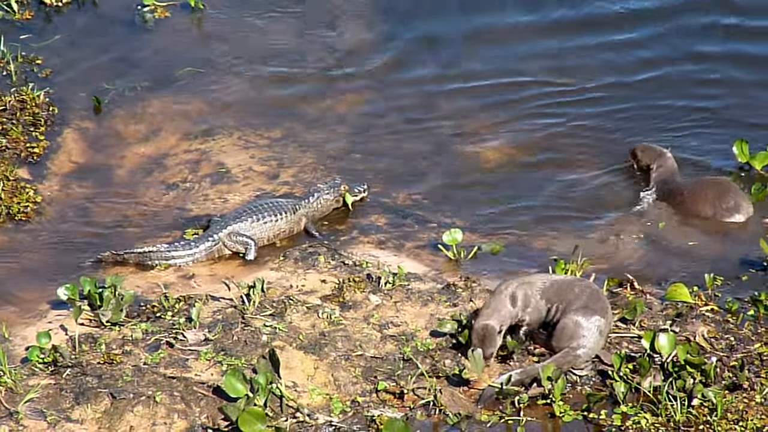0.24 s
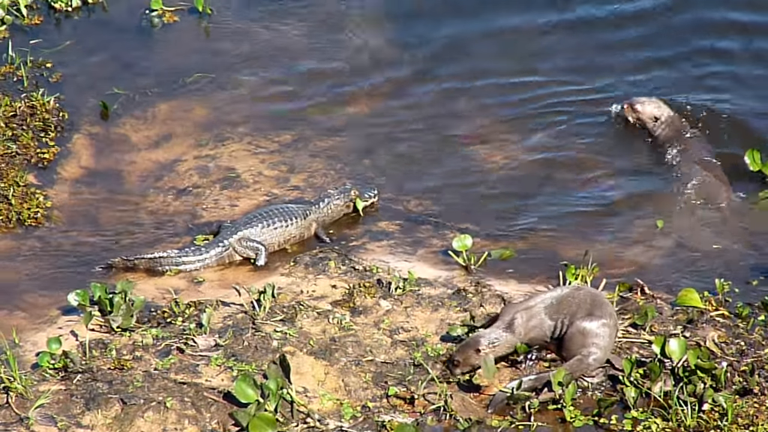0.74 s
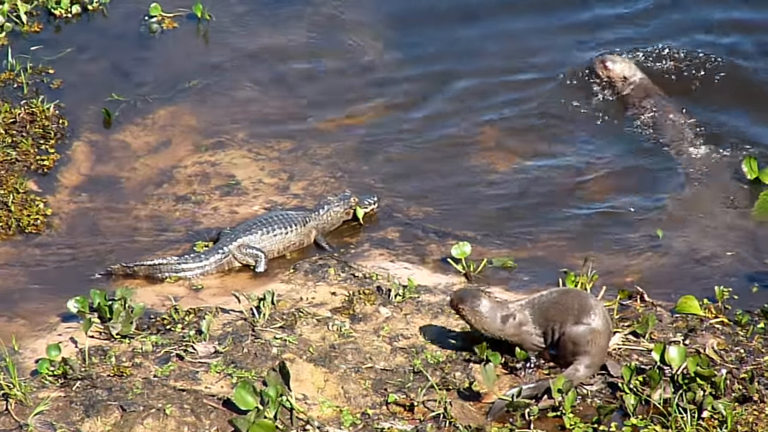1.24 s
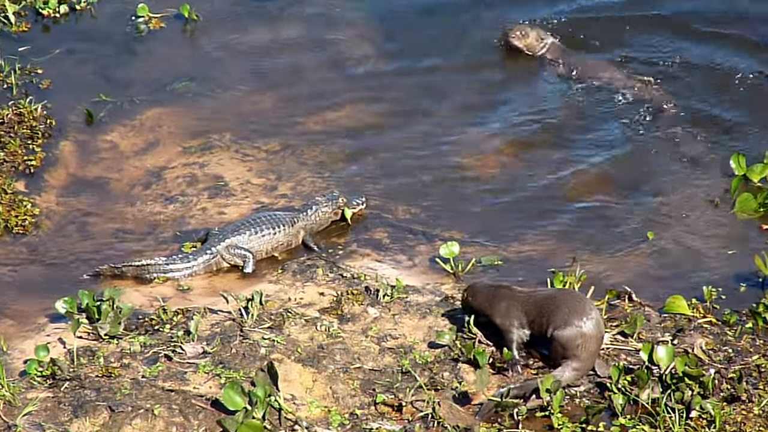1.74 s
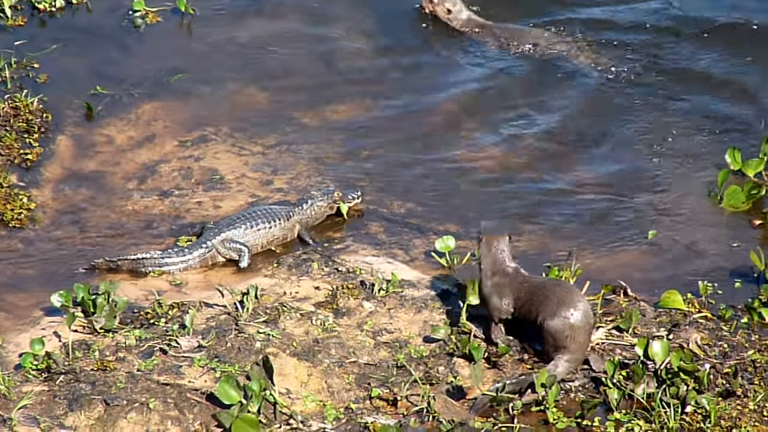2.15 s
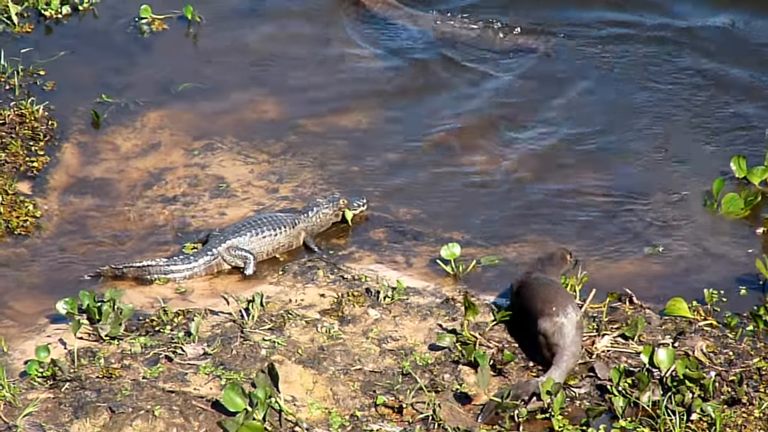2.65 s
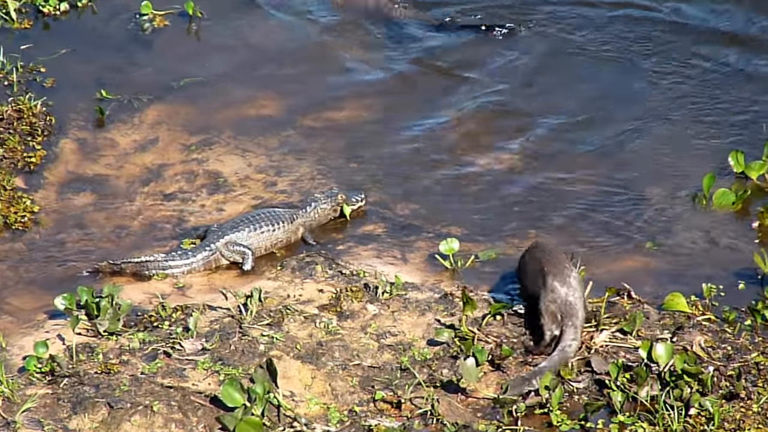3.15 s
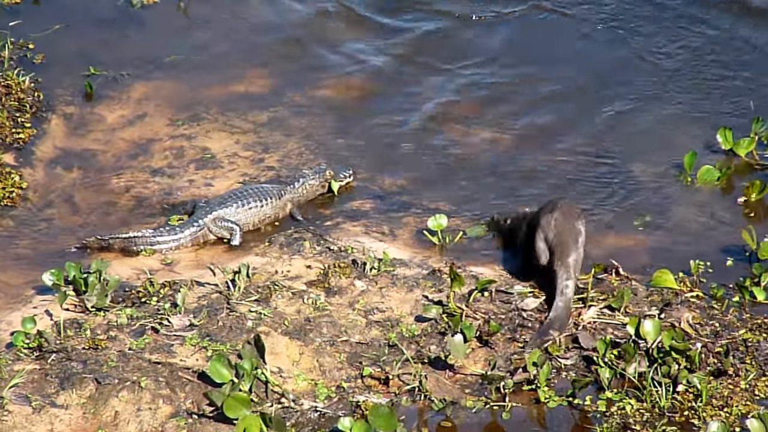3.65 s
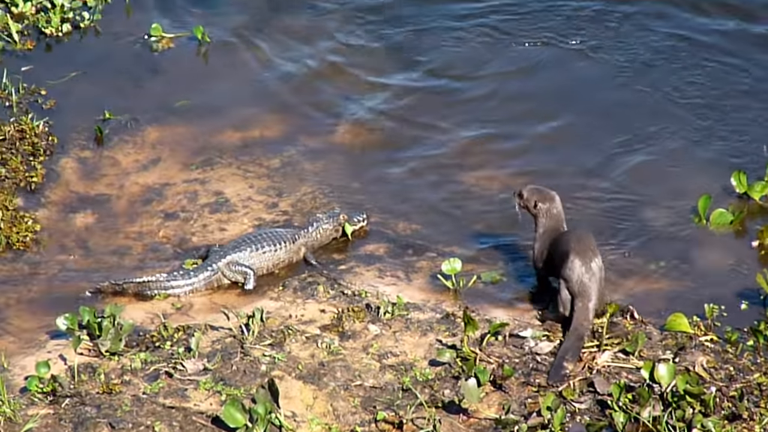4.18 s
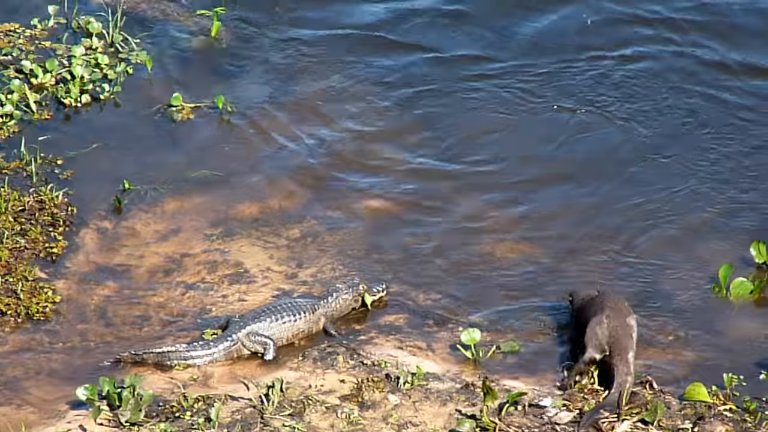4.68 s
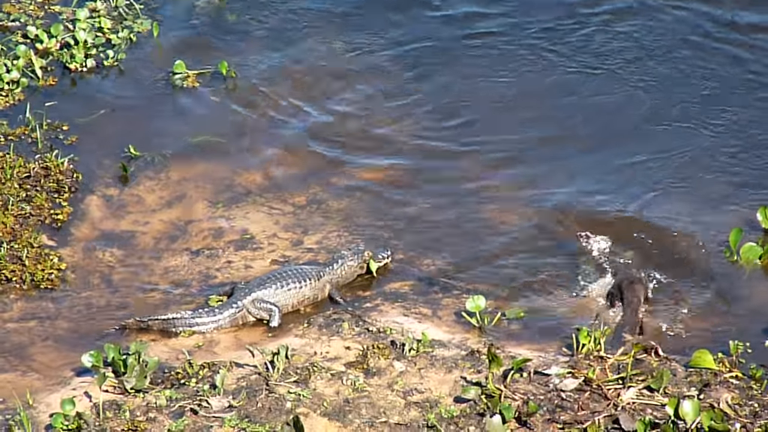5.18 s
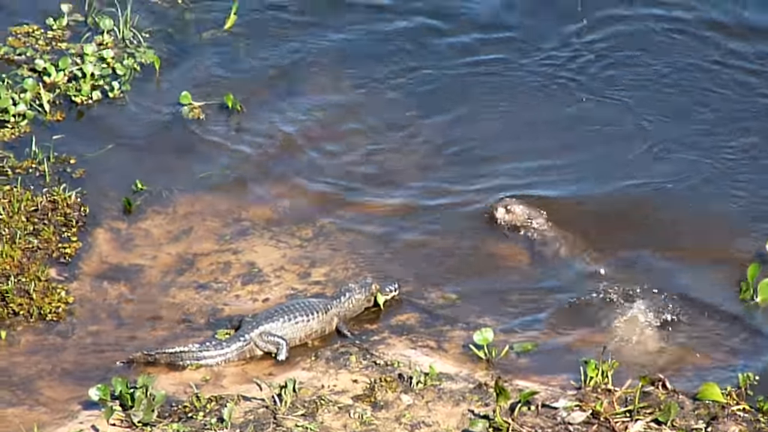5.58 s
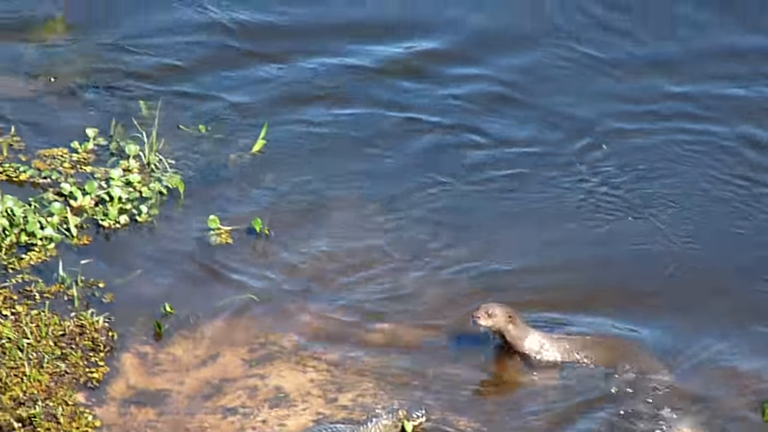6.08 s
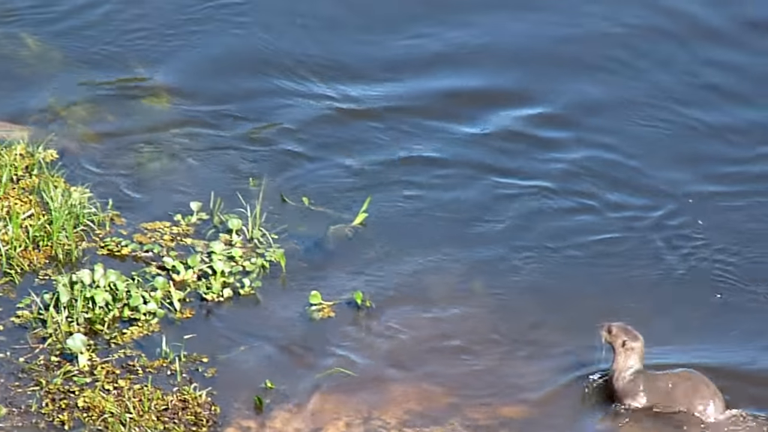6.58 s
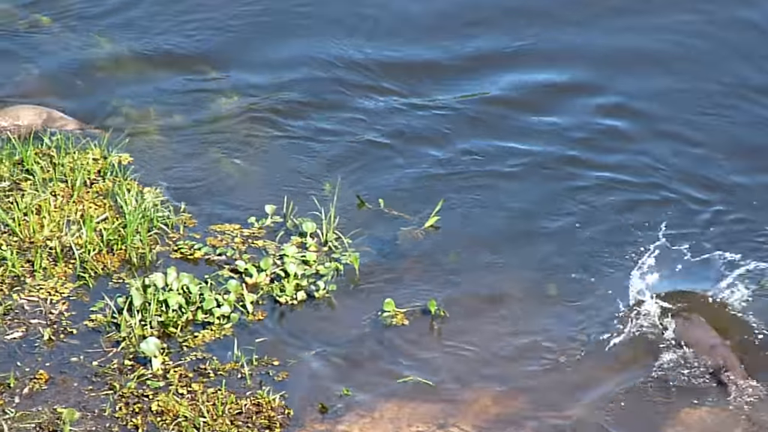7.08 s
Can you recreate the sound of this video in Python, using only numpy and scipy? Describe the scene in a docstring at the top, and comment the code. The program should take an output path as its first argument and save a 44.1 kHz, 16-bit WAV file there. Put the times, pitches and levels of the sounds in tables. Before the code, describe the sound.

A riverbank starts quietly with open-air hiss, a faint wavering hum and gentle water. Swimming otters make small splashes and bubbly plops at about 0.3, 1.4 and 2.7 seconds. Five thin, faint whistles fall in pitch far away between 1.4 and 5 seconds. From around 2.2 seconds, wind buffets the microphone with a low, uneven rumble and occasional soft thumps.

At 3 seconds a giant otter begins calling in short, high, stuttering bursts, each a rapid train of breathy chirps about a fifth of a second long, often turning raspy. Five bursts come closely together up to 4.7 seconds, with a slight echo from the bank. A splash and a cluster of plops follow near 5.1, then more calls at 5.3, 6.1 and, very briefly, 6.4 seconds. The wind is strongest from 6 seconds on, with light splashes and plops continuing until the end, just past 7 seconds.

```python
"""A riverbank. A giant otter calls in stuttering bursts, each a train of short scooped chirps:
harmonics and breath shaped by its throat. Swimming otters splash, and air bubbles ring as plops.
Thin whistles fall far off; the bank echoes calls, water and whistles.
Rising wind buffets the microphone over a faint wavering hum and hiss."""
import sys
import numpy as np
from scipy import signal
from scipy.fft import rfft, irfft, next_fast_len
from scipy.io import wavfile
from scipy.ndimage import map_coordinates

SR = 44100
rng = np.random.default_rng(int(sys.argv[2]) if len(sys.argv) > 2 else 0)


def to_wav(s):
    """Save 16-bit WAV."""
    ch = np.atleast_2d(s).T  # columns
    pcm = np.round(np.clip(ch, -1, 1) * 32767)  # PCM
    wavfile.write(sys.argv[1], SR, pcm.astype(np.int16))


N = 323025

# Spectra of open air, big eddies and quick eddies. Each row: frequency in Hz, relative density in dB.
AIR_DB = [(20, 4.5), (60, -7), (150, -2), (280, 2.5), (420, -1), (700, -5.5), (1100, -8.5), (1600, -15),
          (2500, -17), (4000, -19), (6500, -21.5), (8000, -30.5), (9000, -40.5), (10000, -50.5)]
BIG_EDDY_DB = [(10, -12.5), (25, -0.5), (50, 1), (75, 4), (110, -10.5), (250, -41), (2000, -100)]
QUICK_EDDY_DB = [(30, -34), (70, -6), (105, 2), (170, -1), (270, -7), (400, -13.5), (600, -22.5),
                 (1000, -35.5), (2000, -47), (5000, -68), (10000, -100)]
# Noise bands of the hum. Each row: centre in Hz, half width in Hz, level in dB.
HUM_BANDS = [(308.2, 12, -62), (485, 52, -61), (550.4, 28, -60), (1086, 87, -72.5)]
# Slow swell of the hum tone. Each row: time in seconds, relative level in dB.
HUM_SWELL_DB = [(0.0, -59), (0.45, -66), (1.47, -55.5), (2.14, -65), (2.57, -56.5), (3.38, -62.5),
                (3.99, -54), (4.34, -59.5), (6.03, -59.5), (6.32, -51), (6.99, -57), (7.32, -56.5)]
# Throbs of the hum tone. Each row: start in seconds, level in dB before the envelope.
HUM_THROBS = [(0.926, -40), (1.379, -44), (4.008, -40.5), (4.303, -37), (5.241, -36.5), (6.054, -40),
              (6.345, -40), (6.866, -58)]
# Steady whine: frequency in Hz, level in dB.
WHINE_HZ_DB = (6667, -88)
# Wind on the microphone. Each row: time in seconds, strength in dB.
WIND_DB = [(0.0, -68), (0.33, -65), (1.65, -61.5), (1.71, -50), (1.79, -60.5), (2.04, -56.5), (2.16, -38),
           (2.18, -48.5), (2.24, -61.5), (2.38, -39), (2.61, -35.5), (2.77, -47.5), (3.0, -45),
           (3.12, -56.5), (3.26, -55), (3.32, -44.5), (3.65, -42.5), (3.71, -52), (3.75, -39),
           (3.83, -45.5), (3.89, -47), (3.95, -58.5), (4.24, -56), (4.32, -44.5), (4.52, -45),
           (4.63, -38.5), (4.65, -46), (4.87, -52), (4.93, -40.5), (5.06, -50.5), (5.09, -37.5),
           (5.26, -54.5), (5.36, -43.5), (5.53, -41.5), (5.57, -44), (5.91, -35), (6.03, -40), (6.1, -34.5),
           (6.3, -41), (6.36, -36), (6.38, -35), (6.54, -34), (6.61, -31.5), (6.63, -39), (6.71, -33),
           (6.75, -45), (6.85, -32), (6.87, -39), (7.05, -33.5), (7.14, -40), (7.2, -33), (7.32, -52.5)]
# Hard buffets. Each row: centre in seconds, peak in dB, pitch in Hz, 1/e half length in seconds.
WIND_THUDS = [(.81, -52, 42, .016), (2.153, -29.5, 142, 0.007), (2.587, -32.5, 129, 0.0069),
              (3.751, -29, 70.5, 0.0068), (3.888, -36.5, 76, 0.012), (5.858, -27.5, 70, 0.0057),
              (6.384, -21, 83.5, 0.0044), (6.451, -22.5, 100, 0.0034), (7.055, -22, 111, 0.005),
              (7.187, -26.5, 40, 0.0099)]
# Echo decay of the bank. Each row: frequency in Hz, time to fall 60 dB in seconds.
BANK_T60_S = [(300, 0.14), (2200, 0.6), (3300, 0.64), (8000, 0.2)]
# Far whistles. Each row: start in seconds, length in seconds, top pitch in Hz, end pitch in Hz,
# level in dB, loudest point as a share of the length.
FAR_WHISTLES = [(1.354, 0.098, 2940, 2310, -60.5, 0.84), (2.663, 0.17, 3380, 2350, -66.5, 0.42),
                (3.115, .115, 3230, 3110, -64.5, .6), (3.952, 0.087, 2110, 1430, -64, 0.56),
                (4.813, 0.21, 3260, 2320, -63.5, .33)]
# Splashes. Each row: centre in seconds, level in dB, 1/e half length of the power in seconds.
SWIM_SPLASHES = [(0.313, -63, 0.024), (1.33, -67.5, 0.25), (2.683, -68, 0.24), (5.076, -61, 0.058),
                 (5.543, -69.5, 0.19), (6.55, -71, 0.17), (7.098, -65, 0.24)]
# Large bubbles. Each row: time in seconds, relative level in dB, first pitch in Hz.
BIG_PLOPS = [(.311, -51.5, 1660), (1.385, -57, 1590), (2.545, -54.5, 2060), (2.79, -53.5, 1060),
             (5.077, -53, 690), (5.08, -52, 1650), (5.103, -53.5, 1235), (5.123, -52.5, 1530),
             (5.231, -53, 1480), (6.541, -49, 1326), (6.936, -49.5, 776), (7.077, -50.5, 1520),
             (7.193, -52, 1820)]
# The otter's throat, plain and with jaws wide open. Each row: frequency in Hz, relative gain in dB.
THROAT_DB = [(500, -22), (1050, -8.5), (1500, -4.5), (1900, -5), (2250, 0), (2700, 0), (3300, -4),
             (3800, -12.5), (4500, -11.5), (5500, -25.5), (8000, -59)]
OPEN_JAW_DB = [(500, -23.5), (1050, -9.5), (1500, 1.5), (1900, -4), (2250, -2.5), (2700, -7.5),
               (3500, -1.5), (3950, -9), (4600, -19), (5500, -30), (8000, -49.5)]
# Otter bursts. Each row: start in seconds, chirp count, period in seconds, slow-start lag in seconds,
# first pitch in Hz, full-effort pitch in Hz, scoop as a share of pitch, level in dB, cut at the start
# in dB, cut at the end in dB, first and last roughness from 0 to 1, treble tilt in dB per octave.
CALL_BURSTS = [(3.019, 7, .0206, 0.0012, 900, 871, .27, -55, 5, -4, 0.82, .85, -9),
               (3.275, 8, .0202, .018, 941, 1057, .28, -50, -2.5, 2, .2, .6, -2.5),
               (3.665, 10, 0.023, 0.024, 857, 1050, 0.26, -47, 6, 12.5, 0.13, 0.42, -0.5),
               (4.077, 9, .021, 0.024, 885, 1100, 0.26, -48, 4.5, 3.5, 0.1, .4, 1),
               (4.513, 10, 0.02, 0.016, 943, 1136, 0.2, -47, 1, 1, 0.2, .88, 4),
               (5.281, 10, .0233, .007, 929, 1069, .2, -49, 0.5, 2, 0.19, 0.36, 4),
               (6.05, 9, .0222, 0.019, 950, 1193, 0.16, -49.5, 5.5, 1.5, 0.11, 0.66, 1.5),
               (6.418, 4, .0138, .006, 856, 1214, 0.21, -52, -1.5, 1.5, 0.31, 0.98, 1)]


def amp(db):
    """Decibels to gain."""
    return 10 ** (np.asarray(db) / 20)


def unit(x):
    """Scale to rms 1."""
    return x / np.sqrt(np.mean(x ** 2) + 1e-20)


def along(points, hz):
    """Interpolate (Hz, value) rows on a log axis."""
    knots_hz, values = np.transpose(points)
    return np.interp(np.log(hz + 1), np.log(knots_hz + 1), values)


def curve(rows):
    """(s, value) rows to one value per sample."""
    return np.interp(np.arange(N) / SR, *np.transpose(rows))


def wobble(rate_hz, size=N):
    """Smooth curve through random knots."""
    knots = rng.standard_normal(int(size * rate_hz / SR) + 4)
    return map_coordinates(knots, [np.arange(size) * rate_hz / SR])


def filtered(x, response):
    """Apply a gain given as a function of Hz."""
    size = next_fast_len(N + SR // 2)
    return irfft(rfft(x, size) * response(np.fft.rfftfreq(size, 1 / SR)), size)[:N]


def noise(spectrum):
    """Noise of rms 1 with a (Hz, dB) spectrum."""
    return unit(filtered(rng.standard_normal(N), lambda hz: amp(along(spectrum, hz))))


def add(track, start_s, sound):
    """Mix a sound into the track."""
    part = track[max(round(start_s * SR), 0):][:len(sound)]
    part += sound[:len(part)]


def hiss(level_db=-58):
    """Steady hiss of open air."""
    return amp(level_db) * noise(AIR_DB)


def hum(tone_hz=545, drift_hz=13, tone_db=-61, swell_db=3, shimmer_db=1.5, throb_s=.036):
    """Fuzzy noise bands, a tone that wavers, swells and throbs, and a thin steady whine."""
    bands = np.zeros(N)
    for hz, width_hz, db in HUM_BANDS:
        band = filtered(rng.standard_normal(N), lambda f: 1 / (1 + ((f - hz) / width_hz) ** 2))
        bands += amp(db) * unit(band)
    slow_db = curve(HUM_SWELL_DB)
    envelope = amp(tone_db + slow_db - slow_db.mean() + swell_db * wobble(7) + shimmer_db * wobble(45))
    u = np.linspace(0, 1, int(throb_s * SR))
    throb = (1 - np.exp(-(u / .087) ** 2)) * (1 - u) / 2
    for start_s, db in HUM_THROBS:
        add(envelope, start_s, amp(db) * throb)
    tone = unit(np.sin(2 * np.pi * np.cumsum(tone_hz + drift_hz * wobble(40)) / SR))
    whine_hz, whine_db = WHINE_HZ_DB
    whine = unit(np.sin(2 * np.pi * whine_hz * np.arange(N) / SR))
    return bands + envelope * tone + amp(whine_db) * whine


def wind(big_db=-6, quick_db=-3, big_lumps_db=3, quick_lumps_db=2, big_growth=1.15):
    """One wind strength drives big and quick eddies that push on the microphone; hard buffets thud."""
    strength_db = curve(WIND_DB)
    gust_db = strength_db - strength_db.mean()
    big = unit(amp(big_lumps_db * wobble(16)) * noise(BIG_EDDY_DB))
    quick = unit(amp(quick_lumps_db * wobble(35)) * noise(QUICK_EDDY_DB))
    eddies = amp(big_db + big_growth * gust_db) * big + amp(quick_db + gust_db) * quick
    out = amp(strength_db.mean()) * eddies
    for centre_s, db, hz, half_s in WIND_THUDS:
        t = np.arange(-4 * half_s, 4 * half_s, 1 / SR)
        add(out, centre_s + t[0], amp(db) * np.exp(-(t / half_s) ** 2) * np.cos(2 * np.pi * hz * t))
    return out


def bank_echo(x, build_s=.014, blocks=24):
    """Bank, trees and rippling water scatter sound back, a little differently from moment to moment."""
    out = np.zeros(N)
    for block in np.array_split(np.arange(N), blocks):
        hz, t, spectra = signal.stft(rng.standard_normal(SR * 3 // 4), SR, nperseg=256)
        envelope = amp(-60 * t / along(BANK_T60_S, hz)[:, None]) * (1 - np.exp(-t / build_s))
        tail = signal.istft(spectra * envelope, SR, nperseg=256)[1]
        piece = x[block] * signal.windows.tukey(len(block), .02)
        add(out, block[0] / SR, signal.fftconvolve(piece, tail / np.linalg.norm(tail)))
    return out


def whistles(crest_share=.31, waver=.004, flicker_db=4, fade_db_per_length=19):
    """Nearly pure tones arch and fall, flickering on their way through the wind."""
    out = np.zeros(N)
    for start_s, length_s, top_hz, end_hz, db, loudest in FAR_WHISTLES:
        size = int(length_s * SR)
        u = np.linspace(0, 1, size)
        arch = np.cos(np.pi / 2 * (u - crest_share) / (1 - crest_share)) ** 2
        pitch_hz = (end_hz + (top_hz - end_hz) * arch) * (1 + waver * wobble(150, size))
        tone = unit(np.sin(2 * np.pi * np.cumsum(pitch_hz) / SR) * amp(flicker_db * wobble(70, size)))
        envelope = amp(db - fade_db_per_length * np.abs(u - loudest)) * signal.windows.tukey(size, .2)
        add(out, start_s, tone * envelope)
    return out


def bubble(hz, cycles, rise_share=.12, onset_share=.1):
    """A pocket of air rings, rising in pitch as it nears the surface."""
    u = np.linspace(0, 1, int(cycles / hz * SR))
    envelope = (1 - np.exp(-(u / onset_share) ** 2)) * amp(-30 * u) * (1 - u)
    return 2 * envelope * np.sin(2 * np.pi * cycles * (u + rise_share * u * u / 2))


def water(bubble_count=1300, fizz_hz=1550, wash_gain=.5, lapping_db=-72):
    """Large plops over small bubbles and a soft wash, which swell with every splash."""
    plops, fizz = np.zeros(N), np.zeros(N)
    for time_s, db, hz in BIG_PLOPS:
        add(plops, time_s - .002, amp(db + 2.5) * bubble(hz, cycles=29.5))
    starts_s = rng.uniform(0, N / SR, bubble_count)
    for start_s, (higher, louder) in zip(starts_s, rng.standard_normal((bubble_count, 2))):
        add(fizz, start_s, amp(3.3 * louder) * bubble(fizz_hz * np.exp(.28 * higher), cycles=12))
    wash = noise([(300, -19.5), (700, 2), (1600, -2.5), (2500, -3), (4000, -25.5), (10000, -71.5)])
    t = np.arange(N) / SR
    power = np.full(N, amp(lapping_db) ** 2)
    for centre_s, db, half_s in SWIM_SPLASHES:
        power += amp(db) ** 2 * np.exp(-((t - centre_s) / half_s) ** 2)
    return plops + np.sqrt(power) * unit(unit(fizz) + wash_gain * wash)


def throat(hz, call_hz, gape, tilt_db_per_oct):
    """Gain of throat and jaws; a higher call tightens the throat and lifts its resonances."""
    tension = np.sqrt(call_hz / 1070)
    shape_db = (1.5 - gape) * along(THROAT_DB, hz / tension) + gape * along(OPEN_JAW_DB, hz / tension)
    treble_db = tilt_db_per_oct * np.log2(np.clip(hz / 2200, 1, 1.7))
    return amp(shape_db + treble_db)


def chirp(length_s, hz, slide, scoop, gape, tilt_db_per_oct,
          dive=.689, waver=.022, jitter=.066, flutter=.45, rasp=.68, puff=.78):
    """One puff of voice: the pitch swoops down and up, sweeping its harmonics through the throat."""
    size = int(length_s * SR)
    u = np.linspace(-1, 1, size)
    attack = np.exp(-3 * (u + 1))
    # A forced, wide-jawed chirp starts high and dives; its cycles are uneven in length and strength.
    contour = 1 + slide * u + scoop * np.abs(u) ** 2.48 + dive * gape ** 1.493 * attack
    pitch_hz = hz * contour * (1 + waver * wobble(256, size) + jitter * gape * wobble(915, size))
    phase = 2 * np.pi * np.cumsum(pitch_hz) / SR
    voice = np.zeros(size)
    for k in range(1, 7):
        gain = throat(np.abs(k * pitch_hz), hz, gape, tilt_db_per_oct) * amp(rng.normal(0, 1))
        voice += gain * np.sin(k * phase)
    voice = unit(voice) * (1 + flutter * gape * wobble(700, size))
    # Air escapes once a cycle through the same throat, most of it as the folds part.
    airflow = rng.standard_normal(size) * (1 + np.cos(phase))
    response = throat(np.fft.rfftfreq(size, 1 / SR), hz, gape, tilt_db_per_oct)
    breath = unit(irfft(rfft(airflow) * response, size))
    return unit(voice + (rasp * gape + puff * attack) * breath) * (1 - u ** 10) ** 2


def otter(warm_up_s=.036, sag_hz_per_s=333, cold_dull_db_per_oct=5, scatter_db=.8, stumble_s=.0009):
    """A typical burst starts slow, low and clear, quickens to full effort, sags, roughens and fades."""
    out = np.zeros(N)
    for (start_s, count, period_s, lag_s, first_hz, full_hz, full_scoop,
         db, soft_db, fade_db, first_rough, last_rough, tilt_db_per_oct) in CALL_BURSTS:
        k = np.arange(round(count) + 1)
        onsets_s = k * period_s + lag_s * (1 - .5 ** k)
        scatter = rng.standard_normal((len(k), 4))
        for t, gap_s, (louder, higher, steeper, later) in zip(onsets_s, np.diff(onsets_s), scatter):
            cold = np.exp(-(t / warm_up_s) ** 2)
            spent = t / onsets_s[-2]
            hz = (full_hz + (first_hz - full_hz) * cold - sag_hz_per_s * t) * (1 + .02 * higher)
            slide = .049 * cold - .069 * spent + .048 * steeper  # early chirps tend up, late ones down
            scoop = full_scoop * (1 - .51 * cold)
            gape = first_rough + (last_rough - first_rough) * spent
            treble_db_per_oct = tilt_db_per_oct - cold_dull_db_per_oct * cold
            level_db = db - soft_db * cold - fade_db * spent ** 3 + scatter_db * louder
            sound = chirp(.802 * gap_s, hz, slide, scoop, gape, treble_db_per_oct)
            add(out, start_s + t + stumble_s * later, amp(level_db) * sound)
    return out


def scene(echo_db=-10):
    """Otter, water and far whistles with their echo, over wind, hum and hiss; mono."""
    river = otter() + water()
    far = whistles()
    echo = amp(echo_db) * bank_echo(river + far / 2)
    return (river + far + echo + wind() + hum() + hiss())[None]


def record(dry, top_hz=15700):
    """Brick-wall low-pass."""
    return filtered(dry[0], lambda hz: hz < top_hz)[None]


dry = scene()
out = record(dry)
to_wav(out)
```